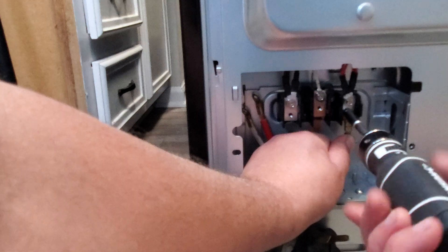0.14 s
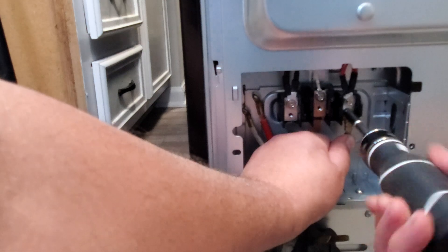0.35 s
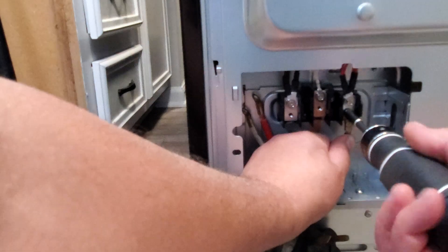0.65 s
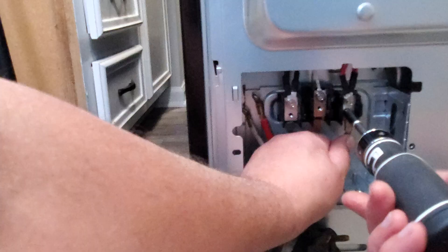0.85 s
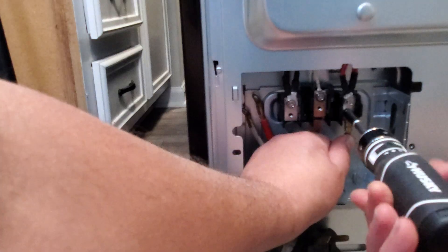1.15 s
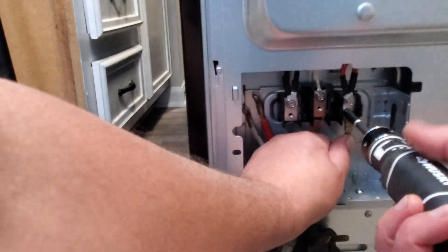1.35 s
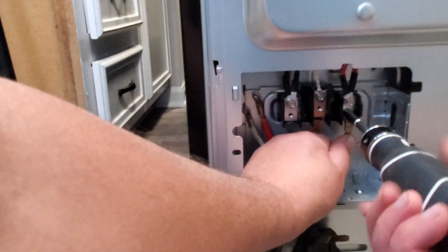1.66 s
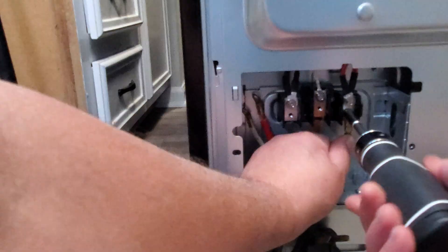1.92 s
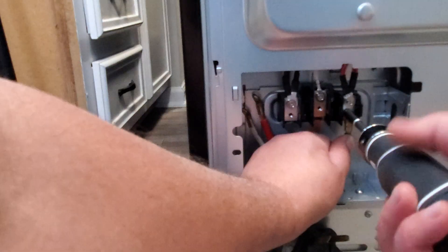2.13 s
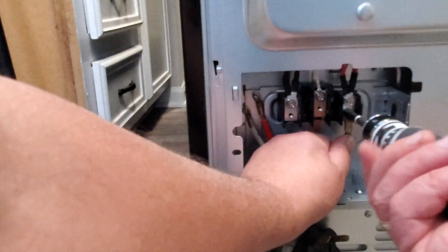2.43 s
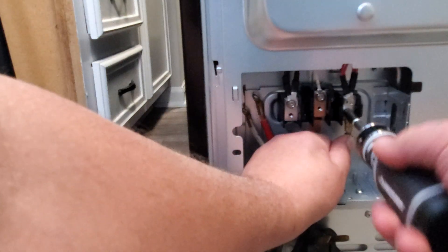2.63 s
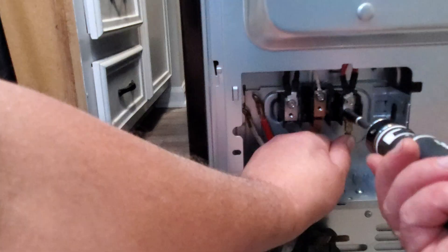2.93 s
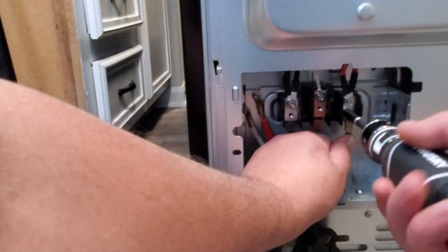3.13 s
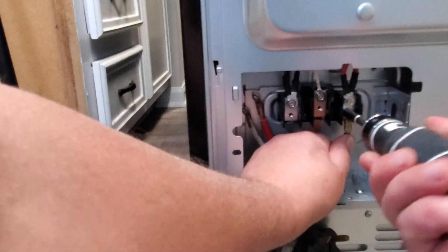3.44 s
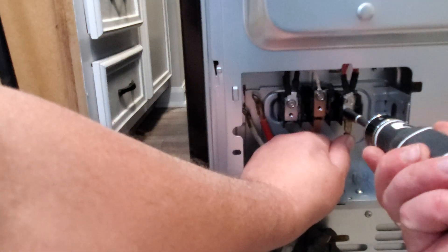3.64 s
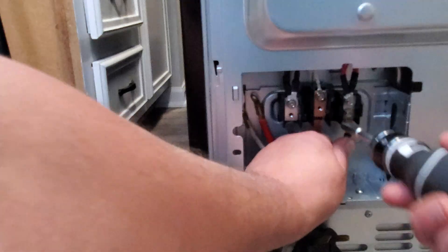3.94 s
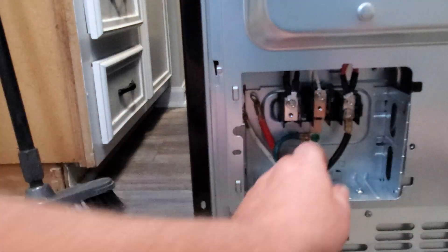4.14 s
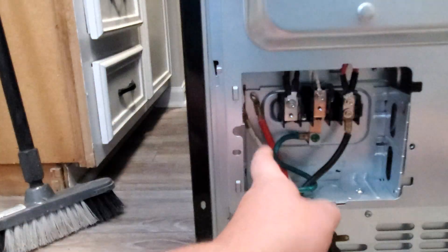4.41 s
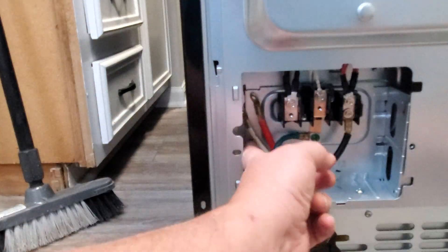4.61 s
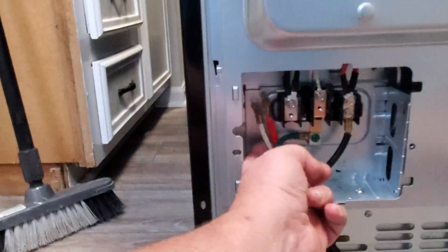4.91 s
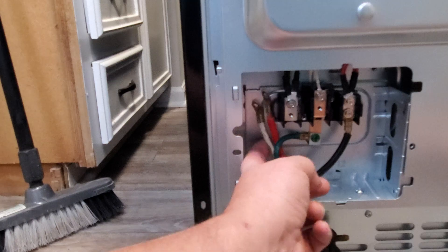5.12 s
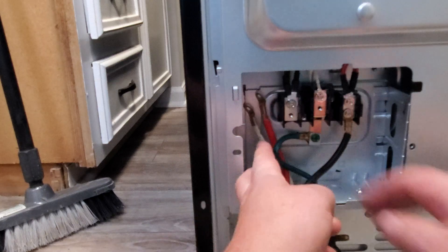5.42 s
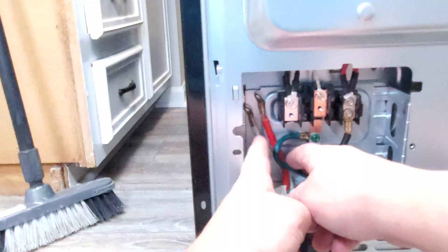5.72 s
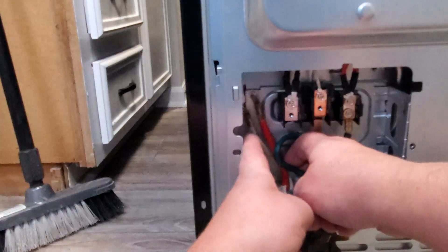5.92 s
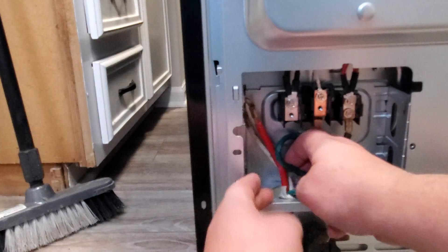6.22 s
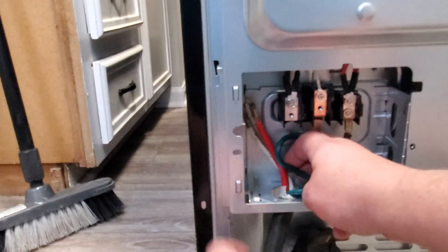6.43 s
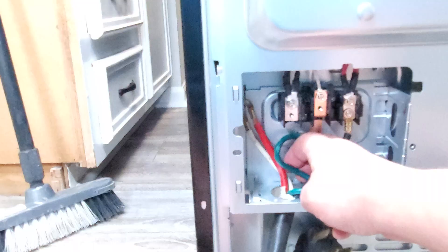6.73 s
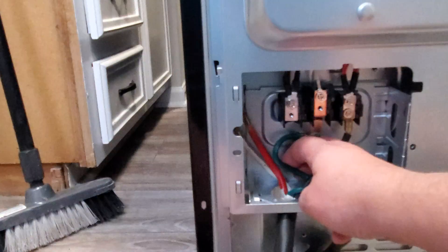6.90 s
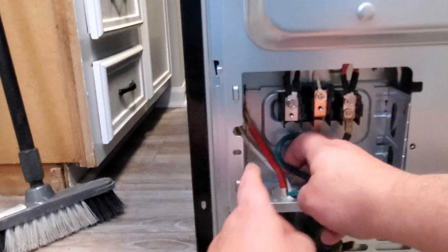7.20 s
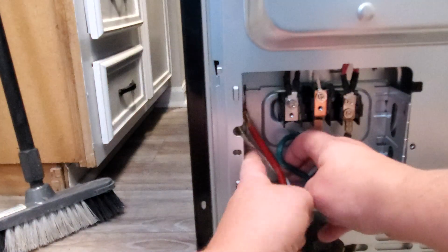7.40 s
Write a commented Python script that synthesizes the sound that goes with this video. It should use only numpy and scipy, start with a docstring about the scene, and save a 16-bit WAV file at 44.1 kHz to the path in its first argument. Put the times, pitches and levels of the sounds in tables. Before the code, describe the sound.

A steady low hum near 60 Hz with dull air fills a small, briefly echoing kitchen, heard by close stereo microphones. From 0 to 4 s a hand screwdriver works a terminal screw: soft skin-on-rubber hisses every third of a second or so, dry bright ticks at 0.16, 1.65, 2.1 and a strong one at 3.06, and a stronger low knock with a short squeak around 2.45. Small boomy cabinet knocks gather from 2.9 to 4, ending in two tiny squeaks at 4.0. A quick hand rub at 4.16, then the tool lands sharply at 4.54 and rocks in a clatter at 4.68 to 4.9. From 5.15 cables bump softly on sheet steel; at 6.05 they chirp, at 6.3 scrape with a rub, at 6.9 squeak loudest with low thumps. Heavier muffled thumps come at 7.23 to 7.3, then a last rough scrape and rub at 7.43.

```python
"""Tightening a terminal screw in a small kitchen

A hand screwdriver tightens a brass terminal screw at the back of a cooker: the bit creaks, ticks and knocks,
and the steel cabinet booms; each is a snap and a chatter of noise that ring a body's resonances.
The tool is put down on the floor with a clatter, then stiff cables bump and creak on the sheet metal
and scrape there as runs of tiny slips. Skin rubs with a soft hiss, and stick-slip squeaks are wobbling tones.
A steady low hum and dull air fill the room; two close microphone ports hear it all, with the room's echo."""
import sys
import numpy as np
from scipy import signal
from scipy.io import wavfile
from scipy.ndimage import uniform_filter1d

SR = 44100
rng = np.random.default_rng(int(sys.argv[2]) if len(sys.argv) > 2 else 0)


def put_to_file(sound):
    """Save the sound as 16-bit audio at rate SR, in the file named by the first command-line argument."""
    columns = np.atleast_2d(sound).T  # one column per channel
    safe = np.clip(columns, -1, 1)
    whole_steps = np.round(safe * 32767)
    wavfile.write(sys.argv[1], SR, whole_steps.astype(np.int16))


N = 333396

# Limits of the five registers of a contact, cabinet boom, body, clack, ring and edge: limit [Hz]
REGISTERS_HZ = [62, 330, 1200, 3500, 7000, 16000]
# Resonances of the screwdriver and terminal: centre_hz [Hz], width_hz [Hz], lift_db [dB]
TOOL = [(1403, 310, -37.5), (2424, 280, 10), (3314, 57, 7), (4750, 600, 18.5), (5400, 850, 10),
        (6400, 410, 3.5), (9350, 1700, 8.5), (12900, 300, -8.5)]
# Hiss of skin on rubber, also lent to scrapes and crackles: hz [Hz], density_db [dB per Hz, relative]
RUB_COLOUR = [(300, -14.5), (1000, -3.5), (2200, 0), (4500, 1), (7500, -6), (12000, -2.5), (16000, -6.5)]
# A cable is dragged along the edge of the sheet: start_s [s], length_s [s], level_db [dB before later gains]
SCRAPES = [(5.13, 0.08, -51), (5.73, 0.11, -50), (5.88, 0.73, -49.5), (6.293, 0.12, -39.5),
           (6.77, 0.4, -47), (7.16, 0.25, -44), (7.42, 0.092, -41.5)]
SCRAPE_ATTACK_S, SCRAPE_SAG_DB_PER_S, SCRAPE_RELEASE_S = 0.08, 20, 0.059
PORTS_APART_HZ = 780   # the two ports hear different noise above this


def from_db(db):
    """Decibels to gain."""
    return 10 ** (np.asarray(db) / 20)


def butter(x, hz, kind, order=2):
    """Causal Butterworth filter."""
    safe_hz = np.clip(hz, 10, SR / 2 - 500)
    return signal.sosfilt(signal.butter(order, safe_hz, kind, fs=SR, output="sos"), x)


def at_hz(points, hz, axis=1):
    """Read a table's column on a log-frequency axis."""
    table = np.array(points)
    return np.interp(np.log(hz), np.log(table[:, 0]), table[:, axis])


def rms_one(pair):
    """Scale a stereo pair so that its middle has rms 1."""
    return pair / np.sqrt(np.mean(pair.mean(0) ** 2) + 1e-30)


def drift(rate):
    """Random wander: straight lines between unit-spread knots, rate of them per second."""
    knots = rng.standard_normal(15000)
    return np.interp(np.arange(N) / SR * rate, np.arange(len(knots)), knots)


def burst(t, rise_s, fall_s):
    """An envelope that swells exponentially up to t = 0 and dies away after it."""
    return np.exp(-abs(t) / (np.where(t < 0, abs(rise_s), abs(fall_s)) + 1e-5))


def strokes(rows, attack_s, sag_db_per_s, release_s):
    """Gain of sliding movements: each swells, sags as it slows, and dies away."""
    gain = np.zeros(N)
    for start_s, length_s, level_db in rows:
        t = np.arange(N) / SR - start_s
        swell = np.clip(t / attack_s + .5, 0, 1) ** 2
        sagging = from_db(level_db - sag_db_per_s * np.maximum(t, 0))
        gain += swell * sagging * np.exp(-np.maximum(t - length_s, 0) / release_s)
    return gain


def port_noise(size):
    """Noise at two ports: alike in the bass, differing in the treble."""
    mid, side, leak = rng.standard_normal((3, size))
    side = butter(side, PORTS_APART_HZ, "high", order=4) + from_db(-18) * leak
    return np.array([mid + side, mid - side])


def noise_bands(size):
    """Stereo noise in half-octave bands, as (centre Hz, band)."""
    edges = np.geomspace(20, 18000, 21)
    white = port_noise(size), port_noise(size)   # neighbouring bands take turns
    for k, (low, high) in enumerate(zip(edges, edges[1:])):
        yield np.sqrt(low * high), butter(white[k % 2], [low, high], "band")


def coloured_noise(colour):
    """Stereo noise with a given spectrum, rms 1."""
    return rms_one(sum(from_db(at_hz(colour, hz)) * band for hz, band in noise_bands(N)))


def resonate(x, body):
    """Each resonance rings on and lifts its own narrow band; a negative lift is a dip."""
    for hz, width_hz, lift_db in body:
        r = np.exp(-np.pi * width_hz / SR)
        zeros = np.array([1, 0, -1]) * (1 - r * r) / 2
        poles = [1, -2 * r * np.cos(2 * np.pi * hz / SR), r * r]
        peak = signal.lfilter(zeros, poles, x + 1e-18)
        x = x + (from_db(lift_db) - 1) * peak
    return x


def register_levels(edge_db, edge_follows, click_db, bright_db, thump_db=None, thump_hz=None):
    """A click fills the upper three registers, tilted by brightness; weight adds a thump in the lower two."""
    click = [click_db, click_db + bright_db, click_db + edge_follows * bright_db + edge_db]
    if thump_db is None:
        return click
    skirt_db_per_octave = 6.5   # a thump weakens in the register farther from its pitch
    limits = np.log2(REGISTERS_HZ[:3])
    octaves_off = abs((limits[:-1] + limits[1:]) / 2 - np.log2(thump_hz))
    return [*(thump_db - skirt_db_per_octave * (octaves_off - octaves_off.min())), *click]


def contacts(rows, body, snap, rough_db, gain_db, edge_db, edge_follows, mass_s=0.0094, swell=False,
             pitch_lift_db=None):
    """Each contact is a snap and a brief chatter that ring the body; levels are rms as if over 10 ms."""
    # The first bounce off the nearby steel: delay_s [s], level_db [dB against the contact's chatter]
    bounce = (0.0034, -20)
    attack_s, thump_q = .0003, 4.7
    size, lead = SR // 2, SR // 10
    t = (np.arange(size) - lead) / SR
    out = np.zeros((2, lead + N + size))
    heavy_s = [mass_s, mass_s / 4, 0, 0, 0]   # the heavy, low registers take longer to stop
    for s, fade_s, *blow in rows:
        levels_db = register_levels(edge_db, edge_follows, *blow)
        modes = body
        if pitch_lift_db is not None:   # the blow also rings at a pitch set by where it lands
            modes = [*body, (blow[-1], blow[-1] / thump_q, pitch_lift_db)]
        roughness = np.repeat(rng.standard_normal(size), 20)[:size]
        chatter = port_noise(size) * from_db(rough_db * roughness)
        port_lag = rng.integers(0, 7)
        start = max(round(s * SR), 0)
        for k, level_db in enumerate(levels_db, len(heavy_s) - len(levels_db)):
            fall_s = abs(fade_s) + abs(heavy_s[k])
            rise_s = fall_s if swell else attack_s
            envelope = burst(t, rise_s, fall_s)
            envelope = envelope + from_db(bounce[1]) * burst(t - bounce[0], rise_s, fall_s)
            force = rms_one(chatter * envelope) / np.sqrt(size)
            # a slow contact snaps less
            force[[0, 1], [lead + port_lag, lead]] += snap * np.exp(-abs(fade_s) * 100)
            sound = butter(resonate(force, modes), REGISTERS_HZ[k:k + 2], "band", order=3)
            if REGISTERS_HZ[k + 1] < PORTS_APART_HZ:   # long waves reach both ports alike
                sound = sound.mean(0, keepdims=True)
            level = from_db(level_db + gain_db) * np.sqrt(SR / 100 / size)
            out[:, start:start + size] += level * rms_one(sound)
    return out[:, lead:lead + N]


def hum():
    """A motor drones as one steady sine, a little out of phase at the ports, over a dull rush of air."""
    # Spectrum of the room's air: hz [Hz], density_db [dB per Hz, relative]
    air_colour = [(20, -17.5), (45, -12.5), (60, 3), (78, 3), (110, -9.5), (220, -9), (420, -16.5),
                  (800, -25), (1500, -79), (4000, -49.5), (16000, -56)]
    hum_hz, hum_db, air_db = 61.6, -42, -50.5   # levels are rms
    port_phase = np.array([[0], [0.17]])   # radians
    turns = hum_hz * np.arange(N) / SR + rng.random()
    tone = np.sqrt(2) * np.sin(2 * np.pi * turns + port_phase)
    return from_db(hum_db) * tone + from_db(air_db) * coloured_noise(air_colour)


def room_response(first_echo_s=0.00064):
    """Dense reflections from floor and cupboards, each noise band dying at its own pace."""
    # The kitchen: hz [Hz], t60_s [s], reverberation_db [dB against the direct sound]
    room = [(100, 0.33, 10), (188, 0.62, 2.5), (595, 0.44, 1.5), (1950, 0.28, -3), (4970, 0.26, -3.5),
            (10300, 0.26, -9), (15800, 0.14, -5.5)]
    size = SR * 3 // 5
    t = np.arange(size) / SR
    response = 0
    for hz, band in noise_bands(size):
        t60 = at_hz(room, hz)
        unit_energy = np.sqrt(2 * np.log(1000) / (t60 * SR))
        decay = np.exp(-np.log(1000) * t / t60)
        response = response + band * decay * unit_energy * from_db(at_hz(room, hz, axis=2))
    return response * np.clip(t / first_echo_s - .5, 0, 1)


def kitchen(x):
    """Sound thrown to the left and to the right finds different paths round the room."""
    return sum(signal.fftconvolve(way[None] / 2, room_response(), axes=1)[:, :N] for way in x)


def hands(grain_db=-0.5, gain_db=0.5):
    """Skin rubs on rubber with a fine, smooth hiss that swells with every turn of the wrist."""
    # A hand slides over the grip or a cable: start_s [s], length_s [s], level_db [dB before gain_db]
    slides = [(0.035, .17, -57), (0.435, 0.12, -53), (0.78, 0.17, -58.5), (1.16, 0.24, -61.5),
              (1.53, 0.28, -63.5), (1.895, .28, -64), (2.26, 0.18, -58.5), (2.72, .11, -57.5),
              (2.96, .18, -57), (3.245, 0.097, -57), (3.47, 0.22, -57), (4.16, 0.074, -50.5),
              (4.28, .2, -59.5), (5.13, 0.26, -61.5), (5.64, 0.24, -72), (5.915, 0.15, -59),
              (6.28, 0.12, -46), (6.62, 0.34, -65), (6.79, .1, -59.5), (7.07, 0.27, -55.5),
              (7.43, 0.11, -47.5)]
    # the hand gathers speed, then slows
    sliding = strokes(slides, attack_s=0.013, sag_db_per_s=38, release_s=0.015)
    # until 3.7 s the fingers still shift on the handle between turns
    gripping = from_db(-73) * (np.arange(N) / SR < 3.7)
    fine_grain = from_db(gain_db + grain_db * drift(120))
    return coloured_noise(RUB_COLOUR) * np.hypot(sliding, gripping) * fine_grain


def putting_down(thud_kept_db=-11):
    """Shaft, rubber handle and cord hit the floor, which thuds and stops short; mostly the clack echoes."""
    # The screwdriver lands and rocks; later the heavy cord knocks: time_s [s], fade_s [s, low registers add],
    # click_db [dB before gain], brightness_db [dB], thump_db [dB before gain], thump_hz [Hz]
    landings = [(4.4678, 0.011, -50, -9, -54, 330), (4.5357, 0.0035, -17.5, -5.5, -16.5, 834),
                (4.631, 0.035, -39, -1.5, -47, 250), (4.6795, 0.004, -29.5, 5, -22, 890),
                (4.686, 0.027, -23, 0, -16.5, 494), (4.691, 0.002, -29.5, -6, -16, 382),
                (4.7788, 0.0078, -27.5, 0, -24, 575), (4.802, 0.01, -33, -9, -31.5, 550),
                (4.893, 0.0094, -31.5, -4.5, -33.5, 170), (7.2338, 0.00053, -45.5, -8, -21.5, 760)]
    # Resonances of the screwdriver on the floor: centre_hz [Hz], width_hz [Hz], lift_db [dB]
    floor = [(114.4, 33, 8), (233, 40, 4.5), (310, 23, 7.5), (501, 78, 5), (633, 230, 6), (940, 43, 3),
             (1260, 630, -3.5), (2200, 710, 11.5), (2710, 130, 1.5), (3850, 260, 0.5), (4960, 1100, 5),
             (7400, 1200, -8.5), (10400, 350, 6.5), (12300, 1500, 10)]
    clatter = contacts(landings, floor, snap=0.49, rough_db=3.0, gain_db=1.5, edge_db=-4.5,
                       edge_follows=1.6, mass_s=0.0002, pitch_lift_db=9)
    thud_kept = from_db(thud_kept_db)
    carried = thud_kept * clatter + (1 - thud_kept) * butter(clatter, 1900, "high", order=1)
    return clatter + kitchen(carried)


def scrapes(smooth_db=-6, hiss_db=-11, grain_db=3, jerk_db=2, shift_db=4):
    """A dragged cable sticks and slips in the clamp; as contact moves, each resonance swells and fades alone."""
    # Spectrum of the sliding friction: hz [Hz], density_db [dB per Hz, relative]
    slide_colour = [(80, -0.5), (200, 8), (450, 3), (900, -0.5), (2200, -1), (4500, -12.5), (8000, -25),
                    (16000, -50)]
    # Fine, sharp resonances of the cord clamp and its bracket: centre_hz [Hz], width_hz [Hz],
    # lift_db [dB before it wanders]
    clamp = [(397, 55, 7.5), (498, 113, 11.5), (1182, 49, 15), (1450, 34, 13), (1750, 116, 9.5),
             (2148, 91, 10), (2695, 45, 9.5), (3490, 93, 12), (4000, 40, 7), (4420, 50, -1), (5400, 40, 5),
             (7100, 33, 20.5)]
    # a scrape is a run of tiny, nearly equal slips at irregular moments
    slips_per_s, slip_spread_db = 400, -0.5
    drag = strokes(SCRAPES, SCRAPE_ATTACK_S, SCRAPE_SAG_DB_PER_S, SCRAPE_RELEASE_S)
    slip_sizes = from_db(slip_spread_db * np.minimum(rng.exponential(1, N), 5))
    slips = (rng.random(N) < slips_per_s / SR) * slip_sizes
    grain = uniform_filter1d(slips, size=24)
    grain = from_db(smooth_db) + grain / grain.std()
    grain = grain * from_db(grain_db * drift(150) + jerk_db * drift(25))
    friction = coloured_noise(slide_colour) * grain
    ringing = friction.copy()
    for mode in clamp:
        ringing += (resonate(friction, [mode]) - friction) * from_db(shift_db * drift(9.9))
    hiss = rms_one(coloured_noise(RUB_COLOUR) * grain)
    return drag * (rms_one(ringing) + from_db(hiss_db) * hiss)


def crackles(gain_db=-10):
    """A jacket catches and lets go: sparse, nearly equal ticks at irregular moments ride on every scrape."""
    ticks_per_s, spread_db = 36, 0.5
    drag = strokes(SCRAPES, SCRAPE_ATTACK_S, SCRAPE_SAG_DB_PER_S, SCRAPE_RELEASE_S)
    sizes = from_db(spread_db * np.minimum(rng.exponential(1, N), 3))
    ticks = (rng.random(N) < ticks_per_s / SR) * sizes
    flecks = uniform_filter1d(ticks, size=40) * coloured_noise(RUB_COLOUR)
    return from_db(gain_db) * drag * rms_one(butter(flecks, [900, 7000], "band", order=1))


def sheet_shimmer(x, count=70, t60_s=0.062, gain_db=-3):
    """Between its main resonances the thin steel has many fine modes that ring on together."""
    t = np.arange(SR // 2) / SR
    modes_hz = np.geomspace(380, 7500, count) * from_db(.2 * rng.standard_normal(count))
    ringing = np.sin(2 * np.pi * modes_hz[:, None] * t) * np.sqrt(modes_hz[:, None])
    response = ringing.sum(0) * np.exp(-np.log(1000) * t / t60_s)
    response = response / np.sqrt(np.sum(response ** 2) * SR / 2 / np.ptp(modes_hz))
    return from_db(gain_db) * signal.fftconvolve(x, response[None], axes=1)[:, :N]


def cables():
    """Stiff cables bump, creak and slide against the steel sheet, which shimmers."""
    # Cables bump on the sheet metal: time_s [s], fade_s [s, low registers add], click_db [dB before gain],
    # brightness_db [dB], thump_db [dB before gain], thump_hz [Hz]
    bump_rows = [(5.153, 0.01, -45, -12, -34.5, 284), (5.2171, 0.0014, -36, -11.5, -56, 400),
                 (5.2516, 0.0099, -33, -6, -34, 294), (5.3005, 0.04, -35.5, -7, -34, 255),
                 (5.7459, 0.0082, -43.5, -5.5, -44, 310), (5.8105, 0.0066, -40, -8.5, -30.5, 278),
                 (6.0847, 0.0033, -28.5, -3.5, -32.5, 430), (6.1265, 0.02, -42, -4.5, -27.5, 284),
                 (6.2945, 0.022, -27.5, -9.5, -26.5, 420), (6.41, 0.025, -28.5, -4, -33.5, 500),
                 (6.7317, 0.0066, -48.5, -6, -35.5, 620), (6.854, 0.0065, -37, -5, -38, 450),
                 (6.8735, 0.0053, -29.5, -11, -26.5, 316), (6.891, 0.0047, -50, -4, -21, 188),
                 (6.933, 0.0097, -51, -11, -24.5, 244), (7.0455, 0.023, -39.5, -6, -24.5, 260),
                 (7.235, 0.026, -33, -6, -17.5, 286), (7.2635, 0.0064, -29, -3.5, -21, 238),
                 (7.285, 0.028, -37, -22, -18.5, 253), (7.3129, 0.017, -31.5, -22, -24, 468)]
    # Jackets creak in the opening: time_s [s], swell_and_fade_s [s], click_db [dB before gain],
    # brightness_db [dB]
    creak_rows = [(6.038, 0.0064, -29, -8), (6.079, 0.0032, -33.5, -5), (6.884, 0.0071, -28, -5),
                  (6.933, 0.0043, -20, -0.5), (7.186, 0.011, -30, -5.5)]
    # Resonances of the steel back sheet: centre_hz [Hz], width_hz [Hz], lift_db [dB]
    sheet = [(103, 7.7, 8), (140, 31, 9.5), (223, 54, 7.5), (316, 30, 0.5), (403, 21, 7), (489, 82, 15.5),
             (560, 52, 2), (1190, 40, -2), (1460, 28, 0), (1910, 250, 6.5), (2210, 170, 1.5),
             (3520, 160, -26.5), (4750, 900, 7), (6200, 79, 11)]
    bumps = contacts(bump_rows, sheet, snap=1.0, rough_db=2, gain_db=-4.5, edge_db=7.5,
                     edge_follows=3.1, mass_s=0.0027, pitch_lift_db=8)
    creaks = contacts(creak_rows, sheet, snap=0, rough_db=-2.5, gain_db=-3.5, edge_db=-1.0,
                      edge_follows=2.7, swell=True)
    slide = from_db(-5.0) * scrapes()
    shimmer = sheet_shimmer(from_db(7.5) * slide + from_db(-10) * bumps)
    return bumps + creaks + slide + crackles() + shimmer


def squeaks(gain_db=-2, wobble=.11):
    """Brass and cable jackets stick and slip: each rasps a short note of rough pitch and level."""
    # Squeaks: time_s [s], swell_s [s, the fade takes half], pitch_hz [Hz before wobble],
    # level_db [dB before gain_db]
    notes = [(0.792, 0.013, 1673, -39), (2.1, 0.012, 2620, -30), (2.448, 0.003, 1870, -25),
             (3.965, 0.0034, 2080, -30), (4.008, 0.0052, 1640, -25), (6.037, 0.0047, 2070, -25),
             (6.08, 0.0021, 2180, -21), (6.872, 0.0053, 2000, -25), (6.933, 0.0059, 2144, -16),
             (6.939, 0.0067, 2850, -22)]
    t = np.arange(N) / SR
    wobbling_t = np.cumsum(1 + wobble * drift(1600)) / SR
    out = np.zeros((2, N))
    for s, swell_s, hz, level_db in notes:
        port_phase = rng.uniform(-1, 1, (2, 1))
        tone = np.sqrt(2) * np.sin(2 * np.pi * hz * wobbling_t + port_phase)
        out += from_db(level_db + gain_db) * burst(t - s, swell_s, swell_s / 2) * tone
    return out * from_db(5 * drift(300))


def ticking(room_db=-2):
    """Small dry metal ticks close by, nearly all from the bit in the screw head, ring the tool."""
    # Light ticks, with one faint late tick near the cables: time_s [s], fade_s [s],
    # click_db [dB before gain], brightness_db [dB]
    tick_rows = [(0.056, .006, -47, -4), (0.156, 0.0012, -23, 8.5), (0.1605, 0.00086, -25.5, -2),
                 (0.199, 0.0014, -31, -8), (0.4525, 0.0037, -37.5, 3.5), (0.4915, 0.0047, -28.5, -2.5),
                 (0.511, 0.00077, -34, -18), (0.531, .002, -58, -7), (0.788, 0.0023, -35.5, -12),
                 (0.801, .002, -34.5, -4.5), (1.2546, 0.0034, -36, -3.5), (1.3095, 0.011, -43, -1.5),
                 (1.6288, 0.0041, -31, 4), (1.6527, 0.0016, -23, -1), (2.0935, 0.00066, -37, -5),
                 (2.1025, 0.0028, -21.5, -5.5), (3.0391, 0.0069, -37, 3.5), (3.0635, 0.0054, -17.5, -5.5),
                 (3.2601, 0.00021, -46, 8.5), (3.6003, 0.0088, -29, -1.5), (3.795, 0.0014, -55.5, 1),
                 (5.6846, 0.0007, -62.5, 15.5)]
    ticks = contacts(tick_rows, TOOL, snap=0.57, rough_db=8.0, gain_db=-6.0, edge_db=-14.0, edge_follows=1.6)
    return ticks + from_db(room_db) * kitchen(ticks)


def screwdriver():
    """The bit creaks as it takes up the load, and seats or slips and shakes the cabinet."""
    # Creaks: time_s [s], swell_and_fade_s [s], click_db [dB before gain], brightness_db [dB]
    creak_rows = [(0.149, 0.00077, -45, -4), (0.5, 0.01, -35, -9), (3.965, 0.002, -47.5, -8.5),
                  (4.006, 0.017, -46.5, 0.5)]
    # Knocks: time_s [s], fade_s [s, low registers add], click_db [dB before gain], brightness_db [dB],
    # thump_db [dB before gain], thump_hz [Hz, only weighs the two low registers]
    knock_rows = [(0.4912, 0.0011, -44.5, 1, -42, 213), (1.2756, 0.016, -47.5, -4.5, -50.5, 500),
                  (1.756, 0.0015, -53, -12, -44.5, 188), (2.1416, 0.0021, -35, -10.5, -32.5, 195),
                  (2.357, 0.0058, -41, -7, -38.5, 262), (2.4445, 0.011, -45.5, -3, -34, 171),
                  (2.4695, 0.0015, -24.5, -6, -21, 182), (2.4993, 0.00076, -38.5, -2.5, -45.5, 400),
                  (2.5911, 0.018, -47, -1.5, -41, 234), (2.9298, 0.0031, -36, -8, -31.5, 217),
                  (2.9643, 0.0024, -45, 0, -36, 236), (3.2237, 0.025, -51.5, -4, -42, 194),
                  (3.4437, 0.0077, -37.5, -6.5, -26.5, 140), (3.4756, 0.0066, -40, -1.5, -32.5, 187),
                  (3.5689, 0.0036, -53, -2, -47.5, 450), (3.6487, 0.0012, -48, -5.5, -42.5, 167),
                  (3.9839, 0.027, -41, -4, -35, 278), (4.0195, 0.0027, -40.5, 3.5, -31, 322),
                  (4.042, 0.0031, -31.5, -9, -38, 620), (4.2434, 0.0018, -49, -9.5, -50, 610)]
    # Resonances of the terminal block on its panel: centre_hz [Hz], width_hz [Hz], lift_db [dB]
    block = [(71, 15, 12.5), (800, 260, -3.5), (146.5, 20, 17), (226, 36, 5.5), (463, 150, 10),
             (1410, 94, -3), (1660, 380, 12), (2085, 310, 7), (2720, 180, 13.5), (3200, 250, 2.5),
             (4480, 1500, 11), (9850, 440, 10.5), (12200, 240, 9.5)]
    creaks = contacts(creak_rows, TOOL, snap=0, rough_db=8, gain_db=5.0, edge_db=-9.5,
                      edge_follows=1.6, swell=True)
    knocks = contacts(knock_rows, block, snap=0.41, rough_db=3.5, gain_db=4.5, edge_db=-4.0,
                      edge_follows=1.62, mass_s=0.013)
    return creaks + knocks


def scene():
    """The work, its echo in the kitchen, and the hum."""
    work = screwdriver() + squeaks() + cables() + hands()
    return work + kitchen(work) + ticking() + putting_down() + hum()


def record(dry, left_treble_db=5.0):
    """The left port is brighter and the right duller; peaks are rounded and the top is cut."""
    treble = butter(dry, 16000, "high", order=1)
    heard = dry + treble * (from_db([[left_treble_db], [-left_treble_db]]) - 1)
    top_cut = signal.ellip(10, .2, 80, 16000, fs=SR, output="sos")
    return signal.sosfilt(top_cut, np.tanh(heard))


dry = scene()
out = record(dry)
put_to_file(out)
```